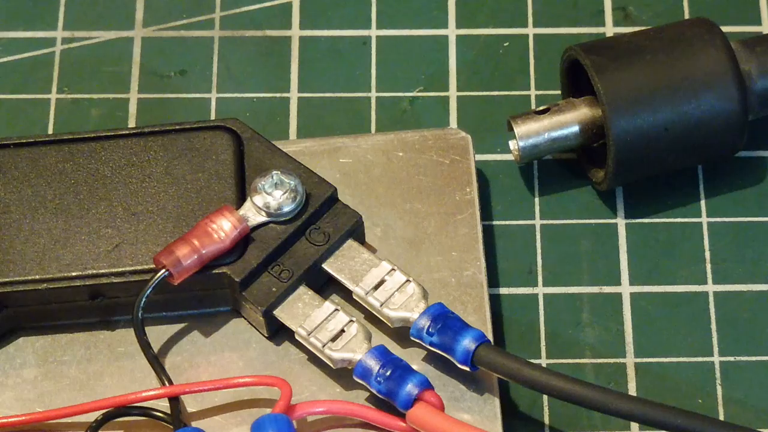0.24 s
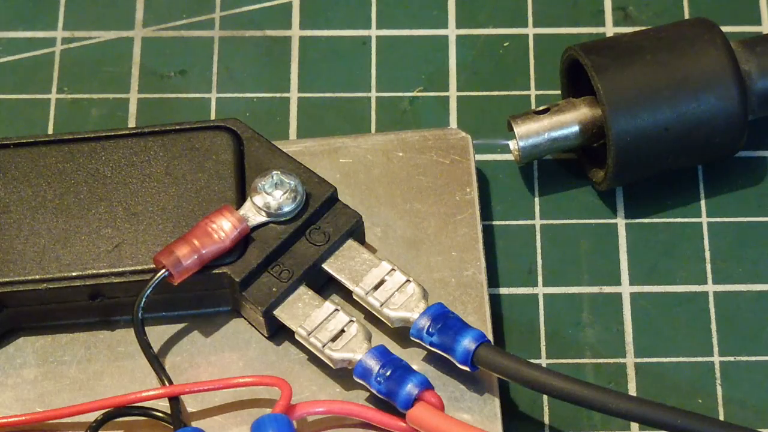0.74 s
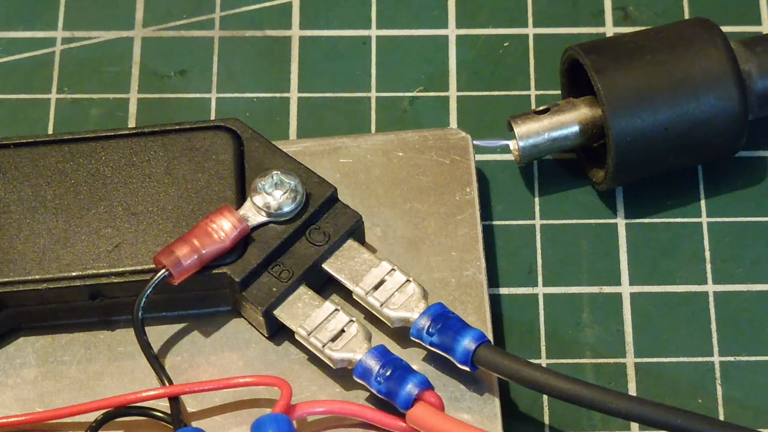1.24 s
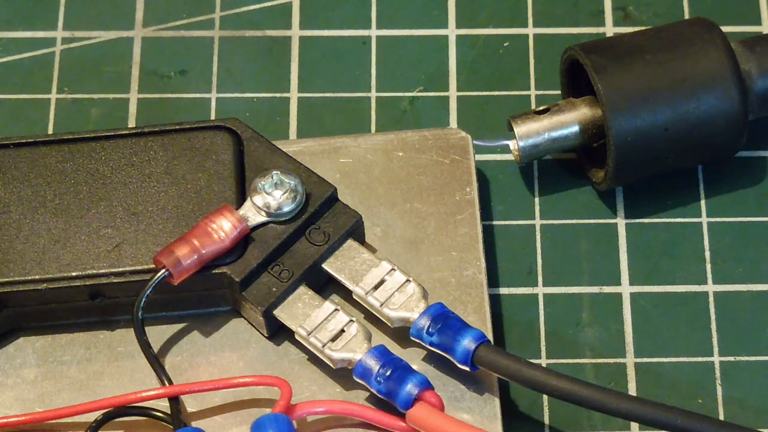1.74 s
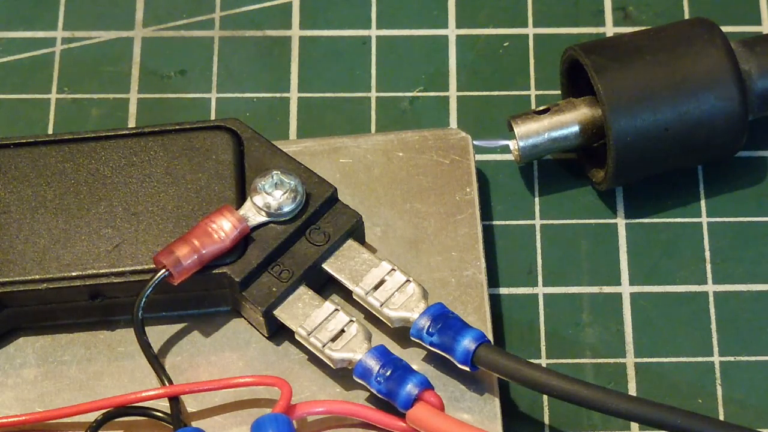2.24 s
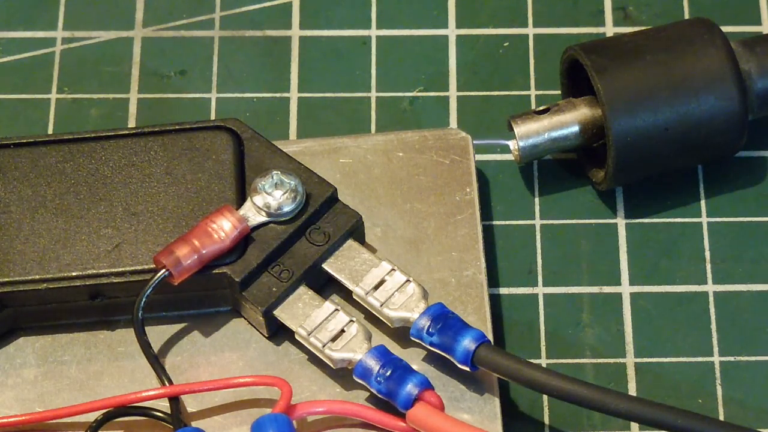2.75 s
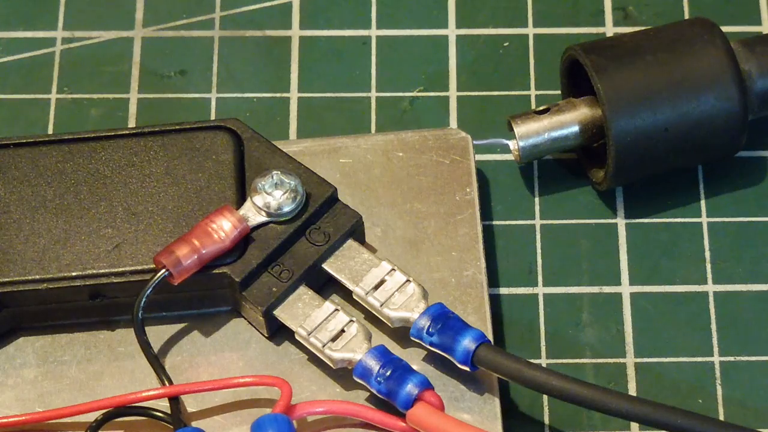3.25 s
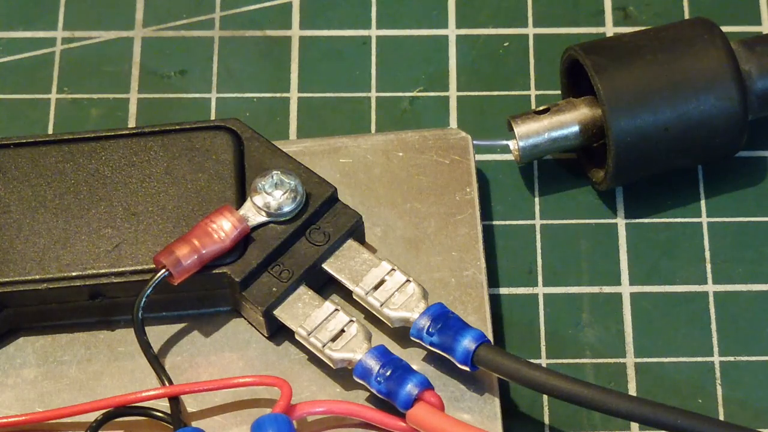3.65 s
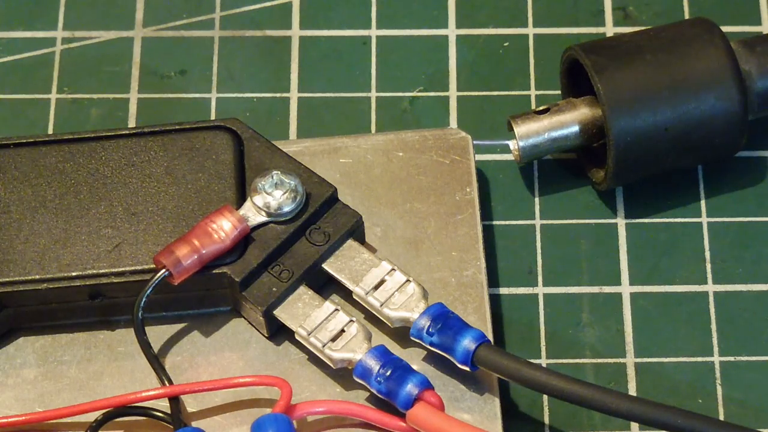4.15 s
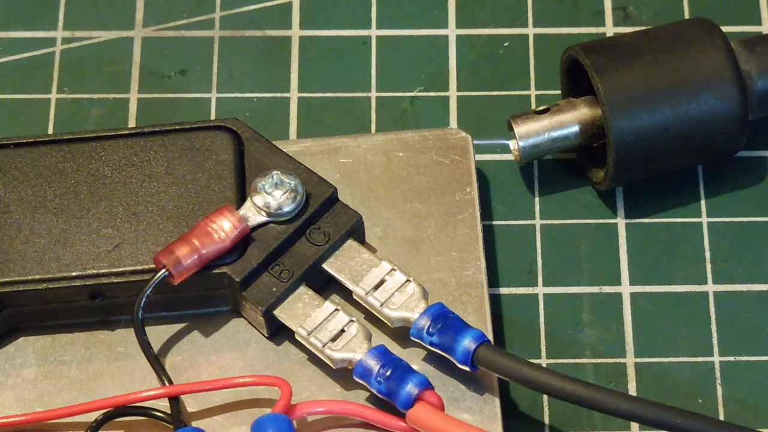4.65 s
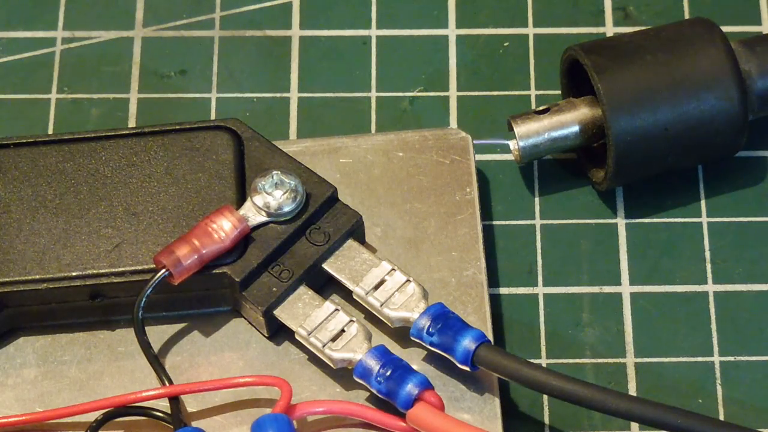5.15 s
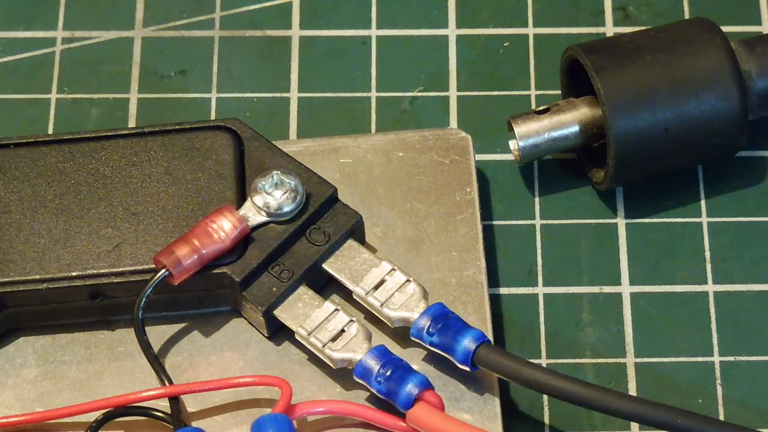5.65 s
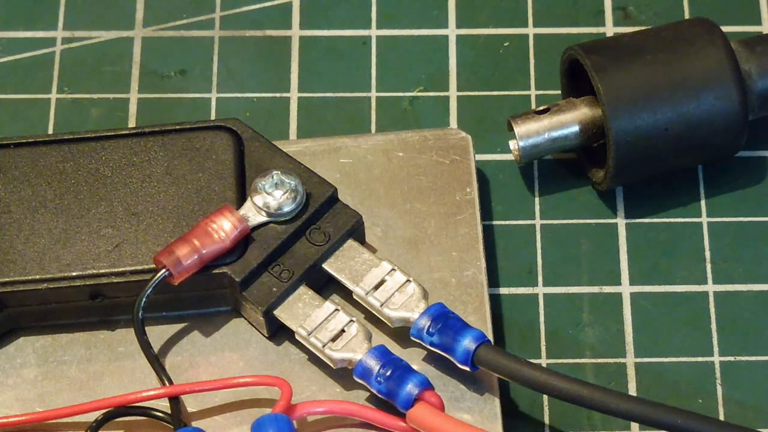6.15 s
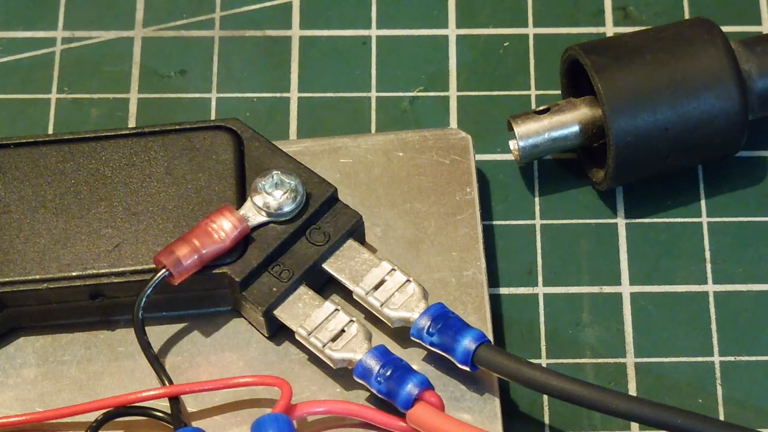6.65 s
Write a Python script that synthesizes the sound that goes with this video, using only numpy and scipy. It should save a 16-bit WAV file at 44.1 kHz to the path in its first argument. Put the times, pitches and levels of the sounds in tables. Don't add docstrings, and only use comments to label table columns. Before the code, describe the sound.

A single crisp electric snap comes at about 0.05 s, a little softer as if from farther back, over quiet room tone. Near 0.19 s the sound dips for an instant and becomes brighter and closer. From 0.22 s sparks snap in a regular rattle, about fourteen a second, quickly rising to twenty and then thirty by 1.2 s. By 1.5 s they merge into a harsh, steady buzz of nearly fifty snaps a second, held until about 3.25 s. Then the rate falls: around thirty a second near 3.8 s, twenty by 4.7 s, fourteen by 5.4 s, and finally separate cracks at eight to ten a second until the end near 6.9 s. Every snap is dry, sharp and nearly equal in strength, with tight reflections, slight low body resonance and a very short noisy room tail. Faint grainy hiss surrounds them; the extreme treble is missing.

```python
import sys
import numpy as np
from scipy import signal
from scipy.fft import rfft, irfft
from scipy.io import wavfile
from scipy.ndimage import uniform_filter1d

SR = 44100
rng = np.random.default_rng(int(sys.argv[2]) if len(sys.argv) > 2 else 0)


def master(y):
    cut = np.clip(np.atleast_2d(y).T, -1, 1)
    pcm = np.round(cut * 32767)
    wavfile.write(sys.argv[1], SR, pcm.astype(np.int16))


def amplitude_ratio(level_db):
    exponent = np.asarray(level_db, float) / 20
    return 10 ** exponent


N = 304290
PAD = 2048


def read(points, hz):
    f, value = np.transpose(points)
    return np.interp(np.log(hz + 1), np.log(f + 1), value)


def causal(points, size=4096):
    cepstrum = irfft(np.log(amplitude_ratio(read(points, np.fft.rfftfreq(size, 1 / SR)))))
    cepstrum[1:size // 2] *= 2
    cepstrum[size // 2 + 1:] = 0
    return irfft(np.exp(rfft(cepstrum)))


def clicks(seconds, heights, size):
    at = np.asarray(seconds)[:, None] * SR
    index = np.round(at).astype(int) + np.arange(-16, 17)
    fade = np.cos(np.pi * (index - at) / 34) ** 2
    shape = np.sinc(index - at) * fade
    margin = 32
    out = np.zeros(size + 2 * margin)
    np.add.at(out, index + margin, heights[:, None] * shape)
    return out[margin:size + margin]


def sparks():
    # (frequency [Hz], level [dB])
    port = [(150, -26.5), (390, -12.5), (500, -1.5), (940, 0), (2500, 4.5), (4120, 0), (4840, -10.5),
            (5170, 3.5), (7500, 2.5), (8300, -17), (8630, -6), (11500, -4.5), (12300, -11.5), (13600, -14)]
    moments = timer()
    strength_db = 0.52 * rng.standard_normal(len(moments))
    strength_db -= 2.7 * (moments < .1)
    train = clicks(moments - .00103, -amplitude_ratio(strength_db - 1.6), N + PAD)
    snap = signal.fftconvolve(bench(), causal(port))
    return signal.fftconvolve(train, snap)[:N + PAD]


def timer():
    # (time [s], wait until next spark [ms])
    knob = [(0.2222, 70.6482), (0.5516, 48.0423), (0.7385, 47.4151), (0.9654, 37.4974), (1.1694, 33.6741),
            (1.462, 23.7967), (1.4944, 20.6012), (3.2422, 20.6008), (3.2791, 22.7917), (3.7042, 30.0647),
            (3.8122, 30.7151), (3.9585, 34.7081), (4.4721, 42.6406), (4.7076, 52.3741), (4.7623, 52.0699),
            (5.4452, 73.607), (5.851, 100.7933), (6.7228, 131.1298)]
    lone_spark_s = .0543
    s, wait_ms = np.transpose(knob)
    moments = [s[0]]
    while moments[-1] < N / SR:
        wait_s = np.exp(np.interp(moments[-1], s, np.log(wait_ms))) / 1000
        moments.append(moments[-1] + wait_s)
    return np.r_[lone_spark_s, moments]


def bench():
    # (delay [ms], pressure [factor])
    echoes = [(0.079, 0.35), (0.249, 0.16), (0.363, 0.21), (0.454, 0.2), (0.935, -0.28), (1.213, 0.16),
              (1.655, 0.17), (1.82, -0.25), (2.001, -0.18), (2.12, -0.16), (3.294, -0.15), (3.481, 0.18),
              (4.212, -0.12), (5.113, -0.12), (5.255, 0.13), (6.429, -0.13), (6.627, 0.19), (6.82, -0.14),
              (7.591, -0.13)]
    t = np.arange(SR // 2) / SR
    start_s = .001
    after = np.maximum(t - start_s, 0)
    direct = (0.0032, 0.98)
    delay_ms, factor = np.transpose([direct] + echoes)
    early = clicks(delay_ms / 1000 + start_s, factor, len(t))
    return early + ringing(after) + scattered(t, after)


def ringing(after):
    # (frequency [Hz], level [dB], time to fall by 60 dB [s], first swing [+1 out, -1 in])
    modes = [(240, -26, .2, -1), (284, -33, .2, -1), (412, -38.2, .03, -1), (472, -40.1, .06, -1),
             (512, -53.5, .2, 1), (588, -37.8, .06, 1), (652, -30.2, .03, -1), (796, -46, .06, -1),
             (932, -34, .03, -1), (1080, -46.5, .06, 1), (1160, -38, .03, 1), (1370, -47.6, .06, -1),
             (1410, -47.2, .06, 1), (1550, -37.5, .03, -1), (1630, -38, .03, 1), (1800, -51, .12, 1),
             (1930, -46.8, .06, 1), (2040, -43.8, .06, 1), (2470, -44.8, .06, 1)]
    swell = 1 - np.exp(-after / .004)
    total = np.zeros(len(after))
    for hz, db, t60, swing in modes:
        total += swing * amplitude_ratio(db - 60 * after / t60) * np.sin(2 * np.pi * hz * after)
    return swell * total


def scattered(t, after):
    # (time [ms], level [dB])
    fading = [(0, -51.5), (.7, -24), (8, -32.5), (12, -35), (20, -39), (45, -51.5), (120, -79.5)]
    # (frequency [Hz], level [dB])
    colour = [(200, -13), (700, -7), (2400, -6), (3400, 2.5), (4840, 2.5), (5400, -9), (8000, 4.5),
              (12300, 7)]
    z = np.exp(2j * np.pi * rng.random((33, len(t) // 32 + 2)))
    dense = signal.istft(z, nperseg=64, noverlap=32)[1][:len(t)]
    ms, level_db = np.transpose(fading)
    loudness = amplitude_ratio(np.interp(after * 1000, ms, level_db))
    tail = dense / dense.std() * loudness * (t < .15) * (after > 0)
    return signal.fftconvolve(tail, causal(colour))[:len(t)]


def hush():
    # (frequency [Hz], level [dB per Hz])
    colour = [(20, -3.5), (40, -8.5), (300, 0.5), (850, -1), (1300, -4.5), (3500, -6.5), (4500, -13),
              (5000, -3.5), (6000, -15.5), (7500, -8.5), (9000, -12.5), (12000, -23)]
    hz = np.fft.rfftfreq(N + PAD, 1 / SR)
    noise = irfft(rfft(rng.standard_normal(N + PAD)) * amplitude_ratio(read(colour, hz)), N + PAD)
    return amplitude_ratio(-51.5) * noise / noise.std()


def camera(x, patchy_db=2.0, fill_db=-17):
    # (from time [s], frequency [Hz])
    treble_limit = [
        (0, 12100),
        (.19, 13600),
        (1.24, 12900),
        (2.53, 12100),
    ]
    # (from time [s], length [s])
    limit_slips = [(.19, .04), (.75, .04), (1.02, .04), (1.16, .03), (2.63, .06)]
    slip_hz = 12900
    # (frequency [Hz], level [dB])
    coarseness = [(150, -20.5), (400, -3), (1000, 0), (2500, -1), (4500, 1), (7000, 1.5), (12000, 1.5)]
    hop, lead = 941, 491
    frames = dict(nperseg=2 * hop, noverlap=hop, window="cosine")
    hz, t, z = signal.stft(np.r_[np.zeros(lead), x], SR, **frames)

    local = np.sqrt(uniform_filter1d(abs(z) ** 2, size=64, axis=0) + 1e-20)
    patches = uniform_filter1d(rng.standard_normal(z.shape), size=16, axis=0) * 4
    step_size = local * amplitude_ratio(read(coarseness, hz)[:, None] + patchy_db * patches)

    start, limit_hz = np.transpose(treble_limit)
    now = abs(t - lead / SR)
    slipped = sum((now >= s) & (now < s + length) for s, length in limit_slips) > 0
    usual_hz = limit_hz[np.searchsorted(start, now, "right") - 1]
    kept = hz[:, None] < np.where(slipped, slip_hz, usual_hz)

    steps = np.round(z / step_size)
    fill = amplitude_ratio(fill_db) * np.exp(2j * np.pi * rng.random(z.shape))
    stored = np.where(steps == 0, fill, steps) * step_size * kept
    return signal.istft(stored, SR, **frames)[1][lead:]


def scene():
    return camera(sparks() + hush())[None, :N]


def roll_off(x):
    return signal.sosfilt(signal.butter(12, 14360, fs=SR, output="sos"), x)


def record(dry):
    change_s, half_width_s = .1885, .004
    distance_s = abs(np.arange(N) / SR - change_s)
    dip = np.minimum(distance_s / half_width_s + .05, 1)
    return roll_off(dry * dip)


dry = scene()
out = record(dry)
master(out)
```